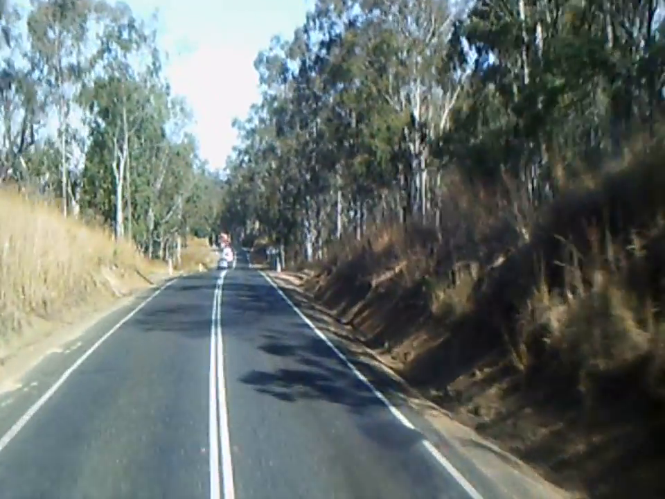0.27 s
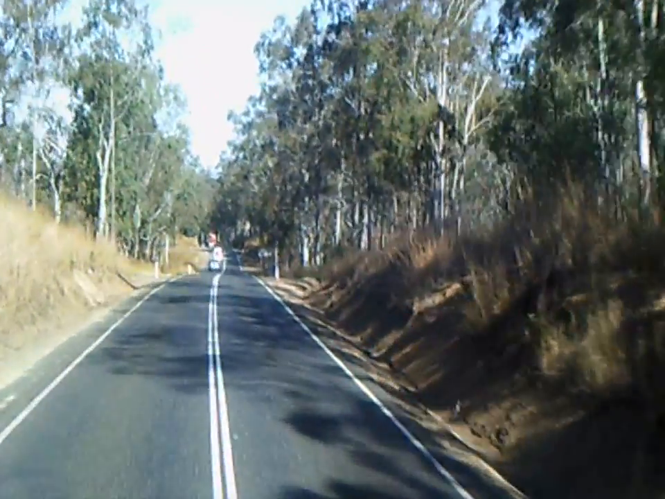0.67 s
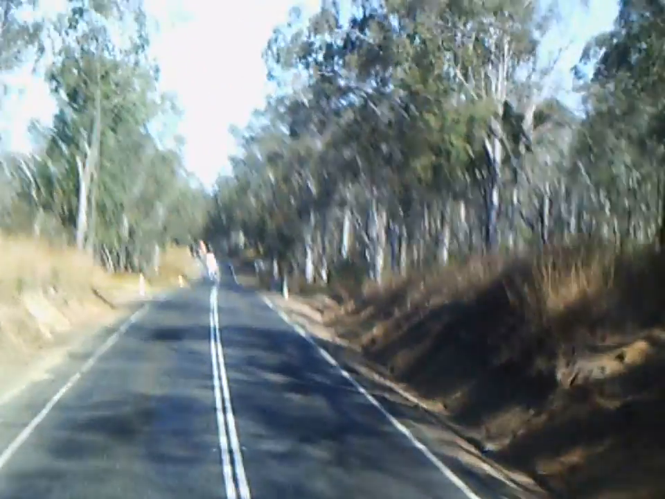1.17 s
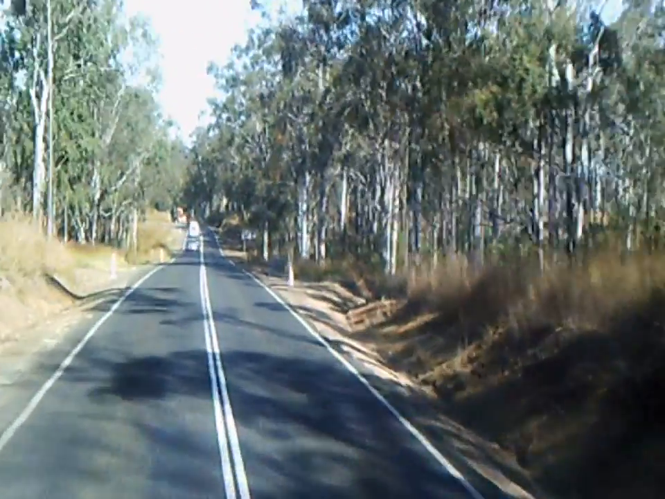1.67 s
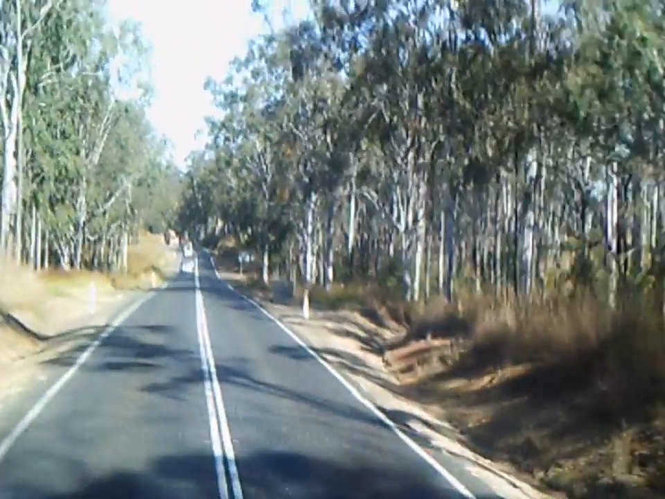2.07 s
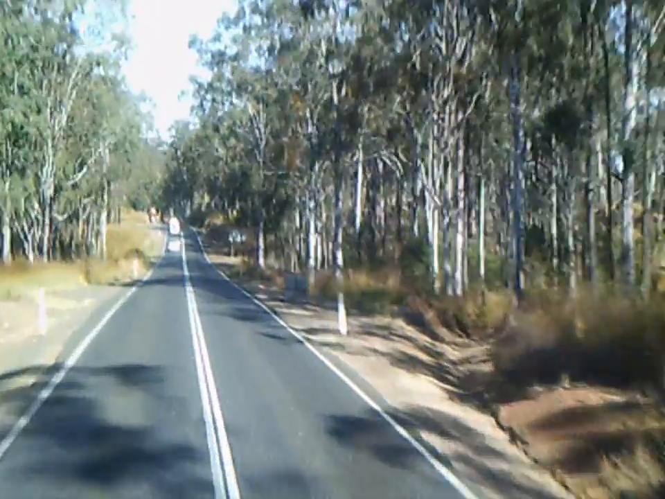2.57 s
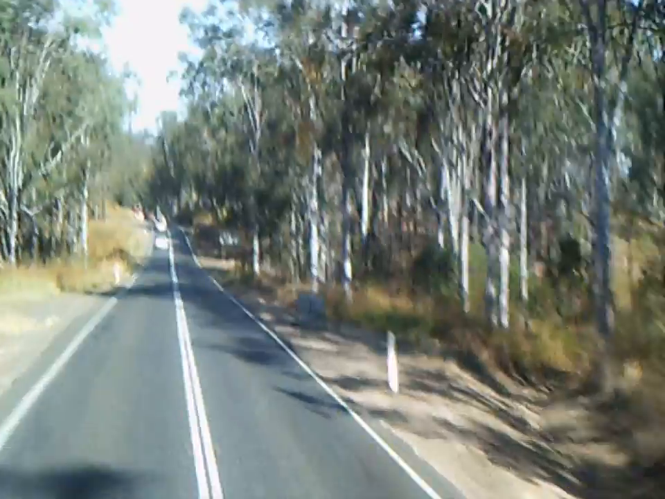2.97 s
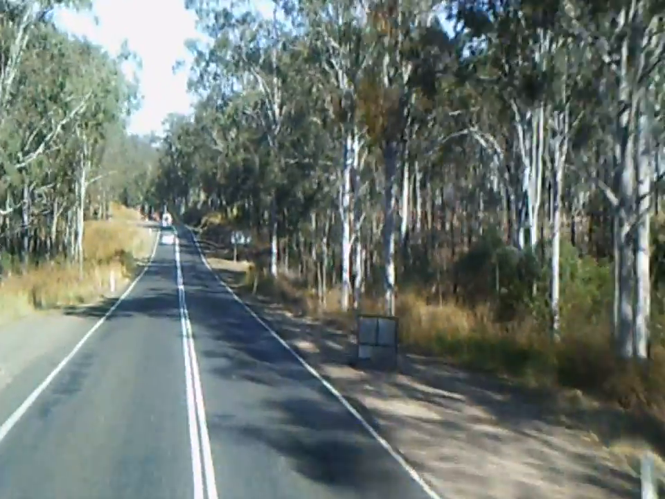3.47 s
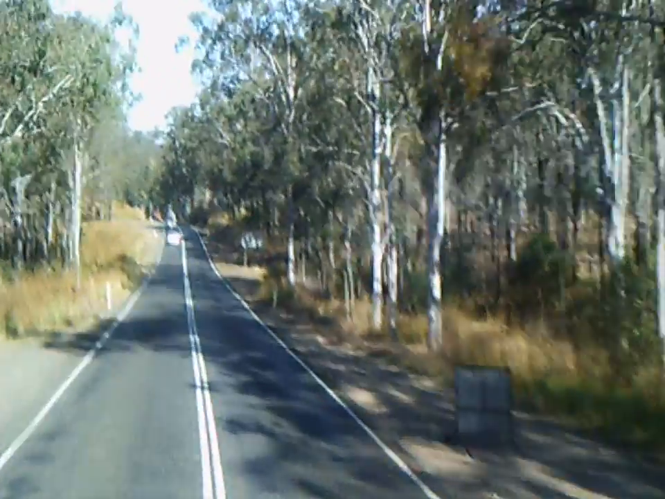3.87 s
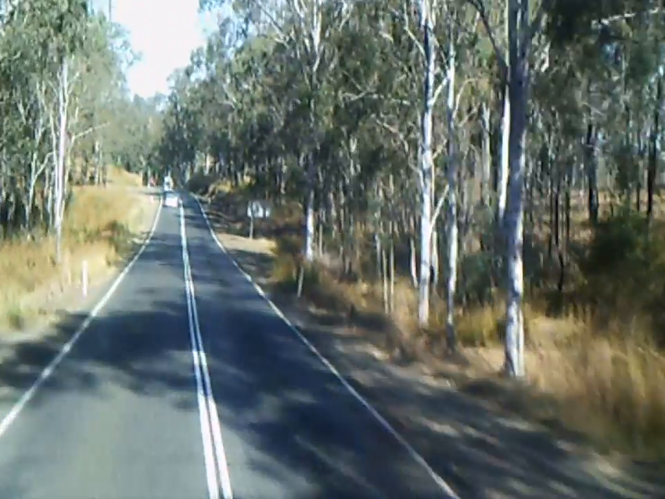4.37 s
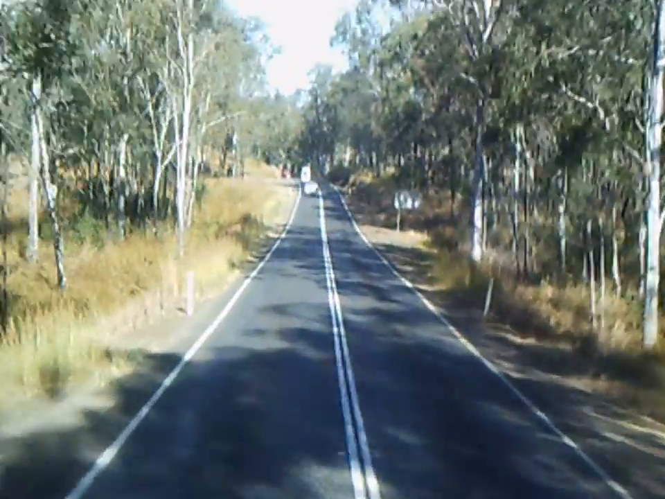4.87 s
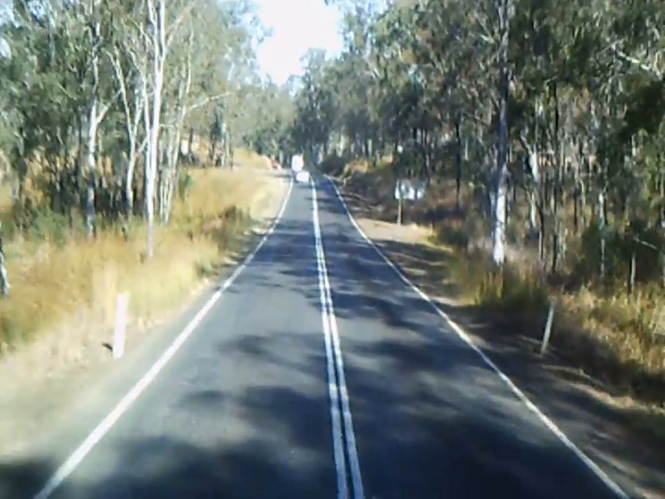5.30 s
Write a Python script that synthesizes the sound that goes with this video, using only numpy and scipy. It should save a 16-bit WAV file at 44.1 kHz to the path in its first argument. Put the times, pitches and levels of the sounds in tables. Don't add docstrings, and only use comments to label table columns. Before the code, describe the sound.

Inside a truck cab on a highway, a low diesel drone and tyre rumble, briefly thinning mid-way, then trim ticks, knocks, creaks and a squeak.

```python
import sys
import numpy as np
from scipy import signal
from scipy.fft import rfft, irfft
from scipy.io import wavfile
from scipy.ndimage import uniform_filter1d

SR = 44100
rng = np.random.default_rng(int(sys.argv[2]) if len(sys.argv) > 2 else 0)


def undo_db(level):
    steps = np.asarray(level, float) / 20
    return 10 ** steps


def generate_wav(signal):
    frames = np.transpose(np.atleast_2d(signal))
    scaled = np.clip(frames, -1, 1) * 32767
    pcm = np.round(scaled).astype(np.int16)
    wavfile.write(sys.argv[1], SR, pcm)


N = 244259

# [t/s, turns per s]
CRANK_SPEED = [(0, 25.55), (.5, 25.8), (.8, 25.75), (1.1, 26.05), (1.5, 26.12), (2.0, 25.9), (2.9, 25.72),
               (3.5, 25.55), (4.1, 25.39), (4.7, 25.27), (5.54, 25.1)]
# [t/s, level/dB]
ENGINE_LOAD = [(0, -36.5), (.33, -37.5), (.95, -37.5), (1.1, -35), (1.52, -33), (1.64, -41), (1.9, -40),
               (2.02, -47), (2.3, -52), (2.68, -52), (2.85, -38), (3.08, -35), (3.7, -33.5), (3.95, -30.5),
               (4.21, -33.5), (4.52, -30.5), (4.85, -34), (5.54, -31)]
# [multiple of crank speed, level over the sixth order/dB]
OTHER_ORDERS = [(1, -2.5), (2, -9.5), (4, -15), (7, -11.5), (8, -12.5), (9, -18.5), (10, -21)]
# (level cruising/dB, share of load swing, gain pulling/dB)
FIFTH_ORDER, SIXTH_ORDER = (-52.5, .4, 14.3), (-49.5, 1.05, 8.64)
GEAR_TEETH, GEAR_DB = 48, -29
BEAT_DB, SPEED_WOBBLE = 1.4, .0007
PULL_FROM_S, PULL_RISE_S = 2.55, .39
PULL_FREES = .59

# [t/s, peak level/dB]
AXLE_HOPS = [(0.1, -32), (.38, -23), (.65, -23.5), (1.08, -20.5), (1.25, -30), (1.56, -27), (2.06, -19),
             (2.24, -18), (2.5, -27), (2.67, -30), (3.56, -24.5), (3.82, -22), (4.1, -28.5), (4.3, -31.5),
             (4.6, -23.5), (4.8, -20), (5.12, -16.5), (5.5, -26.5)]
CAB_SHAKES = [(.35, -25.5), (.78, -42), (1.05, -30), (1.31, -30.5), (1.5, -30), (1.7, -33), (2.0, -26),
              (2.58, -33), (2.9, -30.5), (3.47, -25.5), (3.8, -30.5), (4.0, -29.5), (4.2, -30.5),
              (4.58, -35), (4.91, -32), (5.42, -27)]
DEEP_BOOMS = [(.1, -26.5), (.95, -27), (1.27, -27.5), (1.75, -27), (2.05, -28), (2.47, -33.5), (3.0, -26.5),
              (3.4, -24.5), (4.1, -25), (4.4, -36.5), (4.7, -25.5), (5.1, -27), (5.45, -39)]
# (half length/s, level between swells/dB)
HOP_SWELL, SHAKE_SWELL, BOOM_SWELL = (.097, -36.5), (.092, -38), (.19, -47)
HOP_HZ, SHAKE_HZ, BOOM_HZ, SWAY_HZ = 10.7, 17.5, 35.6, 7.0
SWAY_DB, SPRING_WANDER, BOOM_WANDER = -31, .035, .01
# [f/Hz, level/dB per Hz]
THUD_SPECTRUM = [(12, -41), (24, -7), (33, -2.0), (52, -1.5), (64, -13), (90, -19.5), (300, -81.5)]

# [t/s, level/dB]
ROAR_LEVEL = [(0, -56), (.2, -55), (.37, -54), (.39, -59.5), (.72, -57), (.95, -55.5), (.98, -52.5),
              (2.06, -52), (2.09, -53.5), (2.68, -56.5), (2.71, -52), (2.91, -52), (3.21, -51.5),
              (3.61, -48.5), (3.93, -48), (4.39, -49), (4.7, -48.5), (5.54, -48.5)]
# [f/Hz, level/dB per Hz]
RUMBLE_SPECTRUM = [(13, -27.5), (22, -19), (45, -14), (99, -16), (196, -26.5), (275, -26), (328, -38.5),
                   (450, -44), (580, -83), (990, -120)]
ROAR_SPECTRUM = [(190, -11), (330, -3), (414, -3.5), (464, -8), (578, -5.5), (702, -5.5), (774, -9),
                 (840, -7), (972, -12), (1510, -15), (2300, -34.5), (2990, -51.5), (5060, -120)]
HISS_SPECTRUM = [(1120, -22.5), (1900, 1), (2580, -4), (2880, 1), (3640, -11), (3970, -6.5), (4750, -9.5),
                 (4880, -14), (5280, -11.5), (6140, -9), (8590, -19.5), (9360, -24), (10500, -18),
                 (13600, -57), (22000, -120)]
# [f/Hz, level/dB per Hz]
HISS_TOP = [(11500, -51), (13000, -80)]
# (level at mean roar/dB, share of roar swing, gain pulling/dB)
RUMBLE_LAW, HISS_LAW = (-51, .69, .68), (-68, .72, 1.66)
# [f/Hz, width/Hz, level over roar/dB]
BUZZING_PANELS = [(836, 46, -13), (1492, 274, -14.5)]
FLOOR_PAN = (270.6, 49, -8)
PAN_PULL_DB = 5

# [t/s, f/Hz, level/dB]
TURBO_WHISTLE = [(0, 8150, -80), (.13, 7920, -87), (.3, 7670, -84), (.45, 7750, -84), (.6, 7930, -81),
                 (.7, 7820, -81), (1.0, 7150, -84), (1.2, 7000, -90), (1.45, 7130, -86), (1.62, 7350, -83),
                 (1.72, 7020, -81), (1.85, 6420, -88), (2.1, 5900, -99), (3.2, 5900, -95), (3.9, 6190, -83),
                 (4.4, 6445, -75), (4.8, 6595, -75), (5.54, 6695, -77)]

# [f/Hz, level/dB]
STEADY_WHINE = [(4802, -84), (5599, -86), (7402, -87), (9598, -88), (13501, -105)]
FLICKER_WHINE = [(11999, -91), (12452, -105), (11251, -108)]
PULSED_WHINE = [(5066, -76), (9071, -80), (12979, -104)]
PULSE_RATE_HZ, PULSE_MIDDLE_S, PULSE_SHARE = 13.39, .0395, .71
# [f/Hz, level/dB per Hz]
CIRCUIT_HISS = [(2060, -42.5), (3500, 1), (4580, -17), (4920, -9), (5350, -7), (9360, -2), (12400, -24),
                (13300, -28)]
CIRCUIT_HISS_DB, CIRCUIT_FLICKER_DB = -79, .4

# [t/s, peak level/dB,
# treble peak level/dB]
TICKS = [(0.091, -61, -58), (0.1765, -55, -60), (0.324, -58, -63), (0.945, -66, -64), (0.9594, -61, -64),
         (1.2101, -66, -65), (1.345, -66, -67), (1.8108, -68, -74), (1.9555, -66, -62), (2.5561, -68, -65),
         (3.5324, -60, -67), (1.2632, -55, -64), (1.68, -70, -60), (1.8741, -64, -72), (2.0514, -66, -60),
         (2.392, -52, -62), (2.8834, -58, -72), (3.0014, -57, -69), (3.3424, -48, -68), (3.5903, -58, -60),
         (4.139, -43.5, -56), (4.3735, -49, -57),
         (4.4936, -55, -61), (4.5105, -42, -49), (4.5142, -41, -43), (4.536, -56, -54), (4.545, -48, -52),
          (4.548, -33, -45.5), (4.555, -31, -34.5), (4.5598, -34, -44), (4.586, -53, -66),
          (4.6137, -29.5, -34), (4.6426, -35, -34.5), (4.6795, -41, -54), (4.6877, -53, -47),
          (4.7167, -54, -56), (4.7263, -35, -44), (5.0399, -63, -69), (5.09, -43, -51), (5.111, -56, -66),
          (5.1165, -33, -39.5), (5.126, -48, -61), (5.2584, -68, -75), (5.3423, -46, -62), (5.36, -45, -53),
          (5.369, -36.5, -64), (5.4311, -41, -44.5)]
# [f/Hz, width/Hz, level/dB]
TRIM_BODY = [(1610, 630, -2), (2780, 230, 5), (3370, 450, 4.5)]
TRIM_TREBLE = [(4800, 860, -16.5), (6020, 1190, 3.5), (6420, 1050, 4), (7900, 530, 3), (9880, 680, -4),
               (12200, 1800, -15)]

# [t/s, peak level/dB, f/Hz]
FLOOR_DRUMS = [(0.222, -46, 249), (0.689, -48, 239), (1.117, -41, 304), (1.352, -48, 237),
               (1.606, -53, 248), (1.745, -46.5, 292), (2.048, -44, 295), (2.569, -44, 252),
               (2.676, -44.5, 270), (3.001, -43, 237), (3.075, -44, 287), (3.233, -45, 230),
               (3.326, -37.5, 236), (3.621, -40.5, 256), (3.781, -35, 243), (3.858, -35, 266),
               (4.031, -40, 277), (4.112, -42, 304), (4.356, -40, 281), (4.448, -37, 259),
               (4.588, -37.5, 257), (4.707, -34, 280), (4.951, -37.5, 264), (5.259, -39, 240),
               (5.339, -33.5, 270), (5.504, -41, 284),
               (1.03, -42, 199), (1.212, -44, 231), (1.621, -41, 128), (1.9, -37, 134), (1.971, -38, 159),
             (2.89, -39, 202), (3.289, -46, 197), (3.424, -38, 222), (3.828, -32, 205), (4.219, -38, 202),
             (4.441, -40, 200), (4.615, -32, 204), (4.83, -31.5, 195), (5.33, -42, 200)]
DRUM_DB = -4

# [t/s, peak level/dB, f/Hz]
PLATE_HUMS = [(1.05, -50, 528), (2.684, -53, 860), (3.344, -52, 650), (4.38, -49, 625), (5.395, -52, 890),
              (5.34, -45, 793), (1.243, -51, 716), (1.397, -46, 836), (3.035, -41, 816),
              (3.125, -44.5, 820), (3.232, -46, 846), (3.883, -50, 832), (3.983, -43.5, 857),
              (4.07, -42, 822), (4.347, -45, 830), (4.587, -42, 850), (5.425, -47, 854)]
# [t/s, peak level/dB, f/Hz]
LINKAGE_CLUNKS = [
    (1.0504, -56, 1540),
    (2.6844, -64, 1610),
    (2.7195, -45.5, 1550),
    (2.8853, -43.5, 1520),
    (3.0348, -48.5, 1470),
    (3.116, -52, 1540),
    (4.1362, -49, 1810),
    (4.3804, -60, 1600),
    (5.368, -41, 1050),
]
# [t/s, peak level/dB, #
# f/Hz, overtone level/dB]
PANEL_KNOCKS = [(1.126, -35, 419, -31), (1.24, -43, 355, -7), (1.598, -40, 411, -25),
                (1.775, -50, 376, -17), (2.439, -47, 420, -20), (2.705, -35, 157, -16),
                (3.33, -46, 420, -3), (3.428, -39, 423, -7), (3.556, -35, 412, -13),
                (3.747, -40.5, 377, -11), (3.826, -34, 433, -33), (3.943, -30.5, 365, -10.5),
                (5.34, -48, 365, -12), (5.456, -32.5, 380, -19)]
# [t/s, peak level/dB, f/Hz]
METAL_TINKLES = [(1.245, -68, 5900), (1.40, -68, 6250), (2.12, -67, 5350), (2.885, -62, 6200),
                 (2.895, -66, 9400), (2.955, -62, 6100), (3.199, -58, 6220), (4.478, -57, 2760),
                 (4.775, -59, 6200), (4.488, -63, 2700), (2.73, -64, 3950), (5.406, -60, 3750)]
# [t/s, peak level/dB]
DRY_SNAPS = [
    (3.4494, -31),
    (3.3702, -54),
    (2.7, -53),
    (1.68, -53),
]

# [t/s, length/s, level/dB]
CLOTH_RUSTLES = [
    (2.025, 0.042, -66),
    (2.717, 0.021, -67),
    (2.856, 0.083, -66),
    (3.026, .03, -66),
    (3.11, 0.022, -69),
    (3.45, .04, -68),
    (3.535, 0.07, -66.5),
    (5.374, 0.045, -60.5),
]
# [f/Hz, level/dB per Hz]
CLOTH_SPECTRUM = [(1500, -19), (3000, 5), (9000, -8), (11000, -31), (13000, -58)]

# [t/s, f/Hz, level/dB, gain per multiple/dB]
SQUEAKS = [
    [(2.075, 2730, -95, 0), (2.09, 2810, -77, 0), (2.12, 2850, -77, 0), (2.14, 2800, -95, 0)],
    [(4.398, 2330, -78, -8), (4.408, 2340, -64, -8), (4.42, 2400, -63, -6), (4.43, 2650, -66, -2),
     (4.445, 2750, -65, 1), (4.472, 2740, -66, 2), (4.48, 2680, -68, -5), (4.50, 2660, -65, -4),
     (4.51, 2660, -85, -4)],
    [(5.372, 2800, -85, 0), (5.382, 2830, -72, 3), (5.393, 2850, -64, 0), (5.405, 2900, -67, -5),
     (5.418, 2950, -66, -7), (5.428, 2950, -85, -7)],
]
# [multiple of pitch, level/dB]
SQUEAK_TONES = [
    [(2, -12), (3, 0)],
    [(1, -13), (2, -2), (3, -5), (4, -17)],
    [(1, -3), (2, -13), (3, -5)],
]
# [flutter/dB, pitch jitter as a share]
SQUEAK_ROUGHNESS = [(1.5, .002), (3.5, .006), (5, .02)]

OFFSET = -.0082
CUTOFF_HZ = 14800


def rms_one(x):
    return x / np.sqrt(np.mean(x ** 2) + 1e-20)


def clock():
    return np.arange(N) / SR


def in_time(rows):
    s, *columns = np.transpose(rows)
    return [np.interp(clock(), s, column) for column in columns]


def drift(rate):
    r = np.exp(-80 * np.pi * rate / SR)
    chance = rng.standard_normal(N // 40 + 2002)
    slow = signal.lfilter([1], [1, -2 * r, r * r], chance)[2000:]
    return np.interp(np.arange(N) / 40, np.arange(len(slow)), rms_one(slow - slow.mean()))


def tone(hz):
    turns = np.cumsum(hz + np.zeros(N)) / SR + rng.random()
    return np.sqrt(2) * np.sin(2 * np.pi * turns)


def resonance(x, hz, width):
    r = np.exp(-np.pi * width / SR)
    poles = [1, -2 * r * np.cos(2 * np.pi * hz / SR), r * r]
    return signal.lfilter([(1 - r * r) / 2, 0, (r * r - 1) / 2], poles, x)


def lowpass(x, order, hz):
    return signal.sosfilt(signal.butter(order, hz, fs=SR, output="sos"), x)


def coloured(spectrum, patchy_db):
    hz, db = np.transpose(spectrum)
    bins = np.maximum(np.fft.rfftfreq(N, 1 / SR), 1)
    gain = undo_db(np.interp(np.log(bins), np.log(hz), db))
    noise = irfft(rfft(rng.standard_normal(N)) * gain, N)
    return rms_one(noise * undo_db(patchy_db * drift(15.7)))


def burst(length_s, rise_s, fall_s):
    t = np.arange(round(length_s * SR)) / SR
    shape = (1 - np.exp(-t / rise_s)) * np.exp(-t / fall_s)
    return t, shape / shape.max()


def add(out, s, piece):
    i = round(s * SR)
    out[i:i + len(piece)] += piece[:N - i]


def struck(rows, length_s, rise_s, fall_s):
    out = np.zeros(N)
    t, shape = burst(length_s, rise_s, fall_s)
    for s, db, hz in rows:
        add(out, s, undo_db(db) * shape * np.sin(2 * np.pi * hz * t))
    return out


def pull():
    return 1 - np.exp(-np.maximum(clock() - PULL_FROM_S, 0) / PULL_RISE_S)


def engine():
    turns, = in_time(CRANK_SPEED)
    turns = turns * (1 + SPEED_WOBBLE * drift(2.7))
    firing_db, = in_time(ENGINE_LOAD)
    load_swing = (1 - PULL_FREES * pull()) * (firing_db + 37)

    def order_db(cruising_db, share, pull_db):
        return cruising_db + share * load_swing + pull_db * pull() + BEAT_DB * drift(3.0)

    sixth_db = order_db(*SIXTH_ORDER)
    orders = [(3, firing_db), (5, order_db(*FIFTH_ORDER)), (6, sixth_db), (GEAR_TEETH, sixth_db + GEAR_DB)]
    orders += [(k, sixth_db + db) for k, db in OTHER_ORDERS]
    return sum(undo_db(db) * tone(k * turns) for k, db in orders)


def swells(bumps, half_s, rest_db):
    now = clock()
    swing = sum(undo_db(db) * np.exp(-((now - s) / half_s) ** 2) for s, db in bumps)
    return 20 * np.log10(undo_db(rest_db) + swing)


def chassis():
    hop_db = swells(AXLE_HOPS, *HOP_SWELL)
    shake_db = swells(CAB_SHAKES, *SHAKE_SWELL)
    boom_db = swells(DEEP_BOOMS, *BOOM_SWELL)
    sway = undo_db(SWAY_DB) * tone(SWAY_HZ * (1 + .15 * drift(1.45)))
    hop = undo_db(hop_db) * tone(HOP_HZ * (1 + SPRING_WANDER * drift(3.6)))
    shake = undo_db(shake_db) * tone(SHAKE_HZ * (1 + SPRING_WANDER * drift(2.9)))
    boom = undo_db(boom_db - 7.5) * tone(BOOM_HZ * (1 + BOOM_WANDER * drift(5.2)))
    thuds = undo_db(.45 * boom_db - 23.0) * coloured(THUD_SPECTRUM, patchy_db=2.0)
    return sway + hop + shake + boom + thuds


def road_levels():
    roar_db, = in_time(ROAR_LEVEL)

    def follow(mean_db, share, pull_db):
        return mean_db + share * (roar_db + 54) + pull_db * pull()

    return follow(*RUMBLE_LAW), roar_db, follow(*HISS_LAW)


def tyre_rumble():
    rumble_db = road_levels()[0]
    hz, width, db = FLOOR_PAN
    pan = resonance(resonance(rng.standard_normal(N), hz, width), hz, width)
    pan_db = rumble_db + db - 1.0 + PAN_PULL_DB * pull() + drift(5.3)
    rumble = undo_db(rumble_db + 10.5) * coloured(RUMBLE_SPECTRUM, patchy_db=1.13)
    return rumble + undo_db(pan_db) * rms_one(pan)


def tyre_roar():
    roar_db = road_levels()[1]
    roar = coloured(ROAR_SPECTRUM, patchy_db=1.55)
    for hz, width, db in BUZZING_PANELS:
        buzz = rms_one(resonance(rng.standard_normal(N), hz, width))
        roar = roar + undo_db(db + 1.84 * drift(21.0)) * buzz
    return undo_db(roar_db + 1.5) * roar


def wind_hiss():
    hiss_db = road_levels()[2]
    return undo_db(hiss_db - 1.5) * coloured(HISS_SPECTRUM[:-2] + HISS_TOP, patchy_db=2.0)


def turbo():
    hz, db = in_time(TURBO_WHISTLE)
    return undo_db(db + 3.0 * drift(18)) * tone(hz + 8 * drift(25))


def camera():
    cycle = ((clock() - PULSE_MIDDLE_S) * PULSE_RATE_HZ + .5) % 1
    working = uniform_filter1d(1. * (np.abs(cycle - .5) < PULSE_SHARE / 2), size=100)
    steady = sum(undo_db(db + 1.0 * drift(11)) * tone(hz) for hz, db in STEADY_WHINE)
    flickering = sum(undo_db(db + 2.6 * drift(18)) * tone(hz) for hz, db in FLICKER_WHINE)
    pulsed = working * sum(undo_db(db) * tone(hz) for hz, db in PULSED_WHINE)
    hiss = undo_db(CIRCUIT_HISS_DB) * coloured(CIRCUIT_HISS, patchy_db=CIRCUIT_FLICKER_DB)
    return steady + flickering + pulsed + hiss


def trim_chatter():
    hiss_db = road_levels()[2]
    sizes = undo_db(3.0 * np.minimum(rng.exponential(1, N), 3)) * rng.choice([-1, 1], N)
    hits = rng.random(N) < 90 / SR
    clicks = signal.lfilter([.4], [1, -.6], sizes * hits + 1e-18)
    modes = TRIM_BODY + TRIM_TREBLE[:4]
    chatter = sum(undo_db(db) * resonance(clicks, hz, width) for hz, width, db in modes)
    return undo_db(hiss_db - 13) * rms_one(lowpass(chatter, 4, 9000))


def trim_ring(crack, modes, peak_db):
    ring = sum(undo_db(db) * (-1) ** k * resonance(crack, hz, width) for k, (hz, width, db) in enumerate(modes))
    return undo_db(peak_db) * ring / np.abs(ring).max()


def ticks():
    out = np.zeros(N)
    t, dull = burst(.025, .000056, .0024)
    _, sharp = burst(.025, .00005, .0013)
    for s, body_db, treble_db in TICKS:
        noise = rng.standard_normal(len(t))
        add(out, s, trim_ring(lowpass(noise * dull, 2, 5500), TRIM_BODY, body_db))
        add(out, s, trim_ring(noise * sharp, TRIM_TREBLE, treble_db + 5.0))
    return lowpass(out + 1e-18, 3, 12000)


def drums():
    return undo_db(DRUM_DB) * struck(FLOOR_DRUMS, .16, .019, .016)


def plate_hums():
    return struck(PLATE_HUMS, .15, .00076, .025)


def linkage_clunks():
    out = np.zeros(N)
    t, shape = burst(.12, .002, .0089)
    for s, db, hz in LINKAGE_CLUNKS:
        noise = rng.standard_normal(len(t))
        rattle = rms_one(resonance(resonance(noise, 1480, 700), 1600, 900))
        tones = np.sin(2 * np.pi * hz * t) + .82 * np.sin(2 * np.pi * 1780 * t)
        add(out, s, undo_db(db - 7.0) * shape * (tones + .87 * rattle))
    return out


def panel_knocks():
    out = np.zeros(N)
    t, shape = burst(.069, .008, .011)
    for s, db, hz, overtone_db in PANEL_KNOCKS:
        overtone = undo_db(overtone_db) * np.sin(2 * np.pi * 1.95 * hz * t)
        add(out, s, undo_db(db) * shape * (np.sin(2 * np.pi * hz * t) + overtone))
    return out


def tinkles():
    return struck(METAL_TINKLES, .06, .0013, .0077)


def snaps():
    out = np.zeros(N)
    _, shape = burst(.002, .00002, .00007)
    for s, db in DRY_SNAPS:
        add(out, s, undo_db(db) * shape)
    return lowpass(out + 1e-18, 3, 12000)


def cloth():
    now = clock()
    brushing = sum(undo_db(db) * np.exp(-((now - s - length / 2) / length * 2) ** 4)
                   for s, length, db in CLOTH_RUSTLES)
    return brushing * coloured(CLOTH_SPECTRUM, patchy_db=2.5)


def squeaks():
    out, now = np.zeros(N), clock()
    for rows, tones, (flutter_db, jitter) in zip(SQUEAKS, SQUEAK_TONES, SQUEAK_ROUGHNESS):
        hz, db, tilt_db = in_time(rows)
        hz = hz * (1 + jitter * drift(80))
        sounding = (now > rows[0][0]) & (now < rows[-1][0])
        for k, tone_db in tones:
            level_db = db + tone_db + tilt_db * (k - 2) + flutter_db * drift(60)
            out += sounding * undo_db(level_db) * tone(k * hz)
    return out


def scene():
    from_end = np.minimum(np.arange(N), N - np.arange(N))
    ends = np.sin(np.pi / 2 * np.clip(from_end / 400, 0, 1)) ** 2
    deep = ends * (engine() + chassis())
    road = tyre_rumble() + tyre_roar() + wind_hiss()
    whines = turbo() + camera()
    trim = trim_chatter() + ticks() + snaps() + cloth() + squeaks()
    blows = drums() + plate_hums() + linkage_clunks() + panel_knocks() + tinkles()
    return (deep + road + whines + trim + blows)[None]


def band_limit(x):
    return signal.sosfilt(signal.butter(12, 13560, fs=SR, output="sos"), x)


def record(dry):
    rounded = .9 * np.tanh(dry / .9)
    top_cut = signal.cheby2(8, 30, CUTOFF_HZ, fs=SR, output="sos")
    return band_limit(signal.sosfilt(top_cut, rounded) + OFFSET)


dry = scene()
out = record(dry)
generate_wav(out)
```